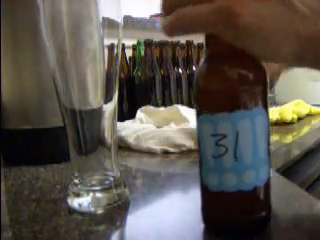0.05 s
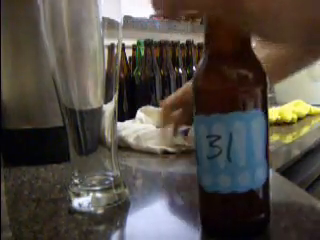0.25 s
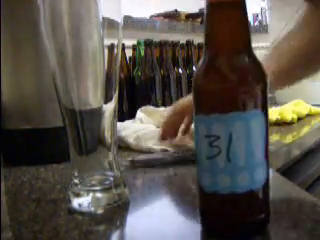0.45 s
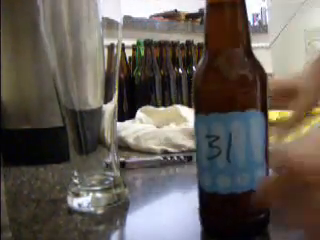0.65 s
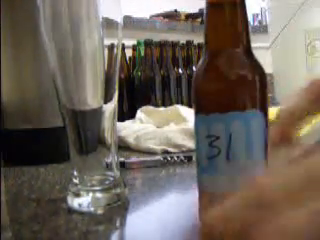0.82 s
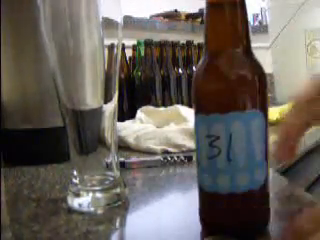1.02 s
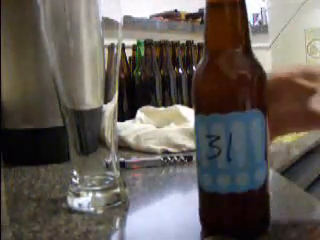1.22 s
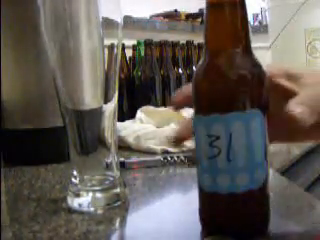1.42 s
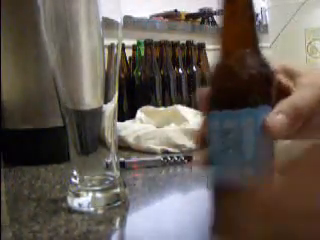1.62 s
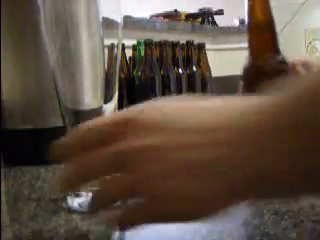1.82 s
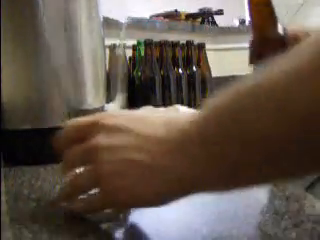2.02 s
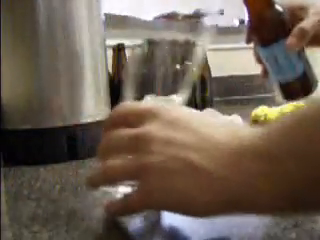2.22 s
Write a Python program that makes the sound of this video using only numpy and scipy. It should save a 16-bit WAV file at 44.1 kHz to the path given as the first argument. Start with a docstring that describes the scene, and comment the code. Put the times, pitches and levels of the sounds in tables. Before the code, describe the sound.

A beer bottle is opened with a sharp snap. The metal opener clatters onto a stone counter, the cap bounces with bright clinks, and the bottle slides briefly. The sounds are close, in a small kitchen with faint hum.

```python
"""A beer bottle is opened on a stone kitchen counter, close to a small microphone.
First the opener snaps the cap off; it then drops, thuds on the counter and clatters to rest.
Next the cap bounces, each impact exciting its ringing modes. The bottle slides away with a rumble of
friction, and last a hand brushes a glass. Throughout, soft bumps sound on the counter, the small room
reverberates, and a background of hiss and hum swells and sinks."""
import sys
import numpy as np
from scipy import signal
from scipy.fft import rfft, irfft
from scipy.io import wavfile

SR = 44100
rng = np.random.default_rng(int(sys.argv[2]) if len(sys.argv) > 2 else 0)


def waveform_to_disk(signal):
    """Save audio, clipped to [-1, 1], as 16-bit WAV at the path in sys.argv[1]."""
    frames = np.transpose(np.atleast_2d(signal))
    scaled = np.clip(frames, -1, 1) * 32767
    samples = np.round(scaled).astype(np.int16)
    wavfile.write(sys.argv[1], SR, samples)


N = 103635
T = np.arange(N) / SR
RING_T = T[:SR // 2]
FREQS = np.fft.rfftfreq(N, 1 / SR)


def amp(db):
    """Decibels as an amplitude ratio."""
    return 10 ** (np.asarray(db) / 20)


def unit(x):
    """Normalisation to an rms of 1."""
    return x / np.sqrt(np.mean(abs(x) ** 2) + 1e-20)


def read(points, hz):
    """Interpolation of a spectrum on a log-frequency axis."""
    f, value = np.transpose(points)
    return np.interp(np.log(hz + 1), np.log(f + 1), value)


def add(mix, start, sound):
    """Superposition: a sound joins the mix at its start in seconds."""
    part = mix[max(round(start * SR), 0):][:len(sound)]
    part += sound[:len(part)]


def gate(start, rise, release, fall):
    """A trapezoidal envelope, with times in seconds."""
    return np.clip((T - start) / rise, 0, 1) * np.clip(1 - (T - release) / fall, 0, 1)


def filtered_noise(gain):
    """Spectral shaping: white noise is weighted by a gain at each frequency."""
    return unit(irfft(rfft(rng.standard_normal(N)) * gain, N))


def noise(colour):
    """Stationary noise with a spectral envelope given in dB."""
    return filtered_noise(amp(read(colour, FREQS)))


def wander(hz):
    """Low-pass noise: random motion up to about the given rate."""
    return filtered_noise(np.exp(-(FREQS / hz) ** 2))


def contact(colour, t60, rattle_db, size=4096):
    """Source and filter: an impulse and a decaying rattle drive a body's minimum-phase response."""
    drive = rng.standard_normal(size) * amp(-60 * T[:size] / t60)
    drive *= amp(rattle_db) / np.linalg.norm(drive)
    drive[0] += 1
    log_gain = np.log(amp(read(colour, abs(np.fft.fftfreq(size, 1 / SR)))))
    body = np.fft.ifft(np.exp(np.conj(signal.hilbert(log_gain)))).real
    return 2 * signal.fftconvolve(drive, body[:size // 2])


def ring(modes):
    """Free vibration: each mode is an exponentially damped sine."""
    return sum(amp(db - 60 * RING_T / t60) * np.sin(2 * np.pi * hz * RING_T) for hz, db, t60 in modes)


def opener():
    """Impact excitation: the opener lands handle first and clatters, ringing itself and the counter."""
    # Each row: start in seconds, then thud, clack and treble levels in dB.
    drops = [(0.4343, -1.5, -9, -8.5), (0.4358, -4.5, -21, -14.5), (.4385, -2.5, -23, -26),
             (.476, -8.5, -2.5, -13.5), (.5033, -15, -7.5, -11), (0.5055, -11, -2.5, -8),
             (0.5102, -12, -9, -12.5), (.518, -10.5, -11.5, -25), (.522, -13, -23, -30),
             (.537, -21, -26, -19), (0.5838, -30, -21, -20.5), (.587, -17, -11, -27),
             (.599, -16.5, -29, -43), (0.6201, -25, -14.5, -30), (0.641, -34, -22.5, -39),
             (0.668, -20.5, -28.5, -57)]
    # Spectra of the three parts of an impact. Each row: frequency in Hz, level in dB.
    thud = [(50, -15), (150, 14.5), (260, 16), (450, 18.5), (700, 13), (1200, 6), (1600, 3), (2600, -19.5),
            (6000, -28)]
    clack = [(200, -4), (900, -3), (1400, 7.5), (2100, 9.5), (3000, 5.5), (4000, 1), (4700, -15.5),
             (10000, -26.5)]
    treble = [(1500, -35), (4000, -4), (6300, 2), (8300, -6), (9900, -1.5), (12000, -14), (15000, -10)]
    # Each row: mode frequency in Hz, level in dB, T60 in seconds.
    counter_modes = [(144, -29, 0.43), (215, -25, .1), (240, -26, 0.23), (261, -27, .2), (358, -25, 0.15),
                     (435, -29, .16), (490, -31, .1), (578, -22, .12), (622, -25, .1), (764, -27, 0.1),
                     (861, -26, 0.1)]
    opener_modes = [(1255, -36, .17), (1373, -24.5, .18), (1630, -31, .1), (1968, -28, .12),
                    (2037, -33, .16), (2112, -28, .12), (2142, -31, .12), (2841, -34, .11)]
    out = np.zeros(N)
    for start, thud_db, clack_db, treble_db in drops:
        add(out, start, amp(thud_db) * contact(thud, t60=.12, rattle_db=4))
        add(out, start, amp(thud_db) * ring(counter_modes))
        add(out, start, amp(clack_db) * contact(clack, t60=.05, rattle_db=4.5))
        add(out, start, amp(clack_db) * ring(opener_modes))
        add(out, start, amp(treble_db) * contact(treble, t60=.035, rattle_db=6.5))
    return out


def snap():
    """Sudden release: the opener's jaw slips off in quick ticks that excite the cap's modes."""
    # Each row: start in seconds, level in dB.
    slips = [(.2453, -13.5), (.2473, -14), (.2481, -13.5)]
    # Spectrum of a slip. Each row: frequency in Hz, level in dB.
    colour = [(100, -9), (650, -6), (1000, -18), (2500, -9), (3200, 4.5), (6000, 3.5), (9500, -1),
              (12000, -9.5), (15000, -3)]
    # Each row: mode frequency in Hz, level in dB, T60 in seconds.
    modes = [(3195, -30, .18), (3465, -25, .1), (3586, -14, .04), (4475, -25, .045), (5051, -22, .04),
             (6257, -24, .04), (7750, -29, .05), (8857, -24, .05)]
    out = np.zeros(N)
    for start, db in slips:
        add(out, start, amp(db) * contact(colour, t60=.033, rattle_db=9))
        add(out, start, amp(db) * ring(modes))
    return out


def cap(split_hz=100, twin_db=-9, upper_hz=4434, upper_t60=.27, wobble_hz=28, flutter_db=2.2):
    """Beating and modulation: each bounce rings the cap's modes; spin wavers their pitch and level."""
    # Each row: start in seconds, click, knock and main ring levels in dB, main pitch in Hz,
    # its T60 in seconds, upper ring level in dB, gain of the other modes in dB.
    bounces = [(.904, -15.5, -7, -21.5, 3828, 0.28, -37, 0.5), (0.945, -8, -9.5, -10, 3915, 0.026, -24, 1),
               (0.9987, -13, -15, -41, 3930, 0.044, -37, -3),
               (1.0021, -12, -32, -14, 3950, 0.05, -47, -1.5),
               (1.0037, -14, -32, -8.5, 3960, 0.033, -24.5, -16),
               (1.007, -23, -45, -9, 3989, 0.04, -43, 0.5),
               (1.0475, -16.5, -30, -22, 3975, 0.086, -40, -16),
               (1.0788, -15, -35, -25.5, 3180, 0.073, -50, 1.5), (1.082, -19, -42, -31, 3990, .1, -59, -27),
               (1.092, -20.5, -41, -29, 3925, 0.08, -56, -22), (1.105, -29, -35, -38, 3970, 0.14, -57, -28)]
    # Each row: mode frequency in Hz, level in dB, T60 in seconds.
    other_modes = [(3470, -42, .14), (7170, -35, .07), (7590, -40, .06), (8510, -37, .05),
                   (11600, -41, .05)]
    # Spectra of a landing. Each row: frequency in Hz, level in dB.
    click = [(300, -44), (2000, 1.5), (2800, 7.5), (3500, 17), (3950, 20.5), (4200, 2), (5200, 4.5),
             (7500, 3.5), (9700, -2), (12000, -12), (15000, -19)]
    knock = [(150, -13), (550, 5), (1100, 10), (1600, 0), (2200, 7.5), (3500, -9), (8000, -20)]
    impacts, rings = np.zeros((2, N))
    main_rise = 1 - np.exp(-RING_T / .002)
    upper_rise = 1 - np.exp(-RING_T / .008)
    for start, click_db, knock_db, main_db, hz, t60, upper_db, other_db in bounces:
        add(impacts, start, amp(click_db) * contact(click, t60=.03, rattle_db=1.5))
        add(impacts, start, amp(knock_db) * contact(knock, t60=.03, rattle_db=1.5))
        beating_pair = ring([(hz, 0, t60), (hz - split_hz, twin_db, t60)])
        add(rings, start, amp(main_db) * main_rise * beating_pair)
        add(rings, start, amp(other_db) * ring(other_modes))
        add(rings, start, upper_rise * ring([(upper_hz, upper_db, upper_t60)]))
    wobble = np.exp(2j * np.pi * np.cumsum(wobble_hz * wander(hz=90)) / SR)
    flutter = unit(amp(flutter_db * wander(hz=110)))
    return impacts + (signal.hilbert(rings) * wobble).real * flutter


def chatter(start=.46, ticks_per_s=1100, level_db=-31.5, decay_db_per_s=54):
    """Shot noise: the opener's loose parts make many tiny random contacts as it settles."""
    # Spectrum of a tick. Each row: frequency in Hz, level in dB.
    colour = [(200, -3), (600, 5), (1100, 1), (2100, -11), (3900, -11), (4600, -12), (8500, -14),
              (14000, -66)]
    struck = rng.random(N) < ticks_per_s / SR
    tick_db = .5 * np.minimum(rng.exponential(1, N), 4)
    ticks = struck * amp(tick_db) * rng.choice([-1, 1], N)
    rattle = unit(irfft(rfft(ticks) * amp(read(colour, FREQS)), N))
    window = gate(start, rise=.012, release=.671, fall=.027)
    return rattle * window * amp(level_db - decay_db_per_s * (T - start))


def bumps():
    """Cushioned impact: hand and glass meet the counter softly, giving a low tone and a dull scuff."""
    # Each row: start in seconds, level in dB, pitch in Hz, length in seconds, relative scuff in dB.
    blows = [(.002, -34.5, 200, 0.032, -10), (0.246, -32, 59.5, 0.028, -3), (0.319, -27.5, 72, 0.048, -9.5),
             (0.339, -25, 381, 0.042, -1.5), (0.35, -23.5, 177, 0.043, -8), (.371, -23.5, 383, 0.015, 0),
             (.376, -15, 208, 0.027, -13), (0.393, -25, 122, 0.036, -15), (0.876, -21, 50.4, 0.068, -12),
             (0.894, -35, 114, 0.051, -4), (1.316, -29.5, 58, 0.081, -15.5),
             (1.615, -25.5, 119.3, 0.11, -14.5), (1.695, -33, 370, 0.036, -5)]
    # Spectrum of the scuff. Each row: frequency in Hz, level in dB.
    scuff = [(40, 10), (150, -0.5), (400, 0.5), (720, -6), (1100, -20), (2000, -25), (8000, -66)]
    out = np.zeros(N)
    for start, db, hz, length, scuff_db in blows:
        u = T / (.24 * length)  # the envelope peaks at u = 1
        envelope = amp(db) * (u * np.exp(1 - u)) ** 2
        add(out, start, envelope * (np.sin(2 * np.pi * hz * T) + amp(scuff_db) * noise(scuff)))
    return out


def slide(start=1.649, rise=.059, grind_db=-35.5, grain_db=2.5, lift_db_per_s=62):
    """Forced vibration: grainy friction under the bottle drives the counter's resonances."""
    # Each row: centre frequency in Hz, half-width in Hz, level in dB.
    resonances = [(224.7, 11, -38.5), (365, 13, -42), (682, 26, -40.5)]
    # Spectrum of the friction. Each row: frequency in Hz, level in dB.
    colour = [(40, -44), (110, 6), (160, -7), (224, 9.5), (300, -21), (365, -10), (450, -4), (590, -12.5),
              (690, -2.5), (930, -15.5), (1300, -16), (3000, -22.5), (9000, -40), (15000, -50)]
    drone = sum(amp(db) * filtered_noise(1 / (1 + ((FREQS - hz) / width) ** 2))
                for hz, width, db in resonances)
    grind = amp(grind_db) * unit(noise(colour) * amp(grain_db * wander(hz=119)))
    lift = amp(-lift_db_per_s * np.maximum(T - start - rise, 0))  # the weight comes off
    return gate(start, rise, release=1.815, fall=.083) * (grind + drone * lift)


def rustle(start=2.073, rise=.015, t60=.55, level_db=-46.5):
    """Soft friction: the hand takes the glass with a dull, decaying brush of noise."""
    # Spectrum of the brush. Each row: frequency in Hz, level in dB.
    colour = [(60, -4), (140, 7), (550, -11), (1200, -33)]
    age = np.maximum(T - start, 0)
    return np.minimum(age / rise, 1) * amp(level_db - 60 * age / t60) * noise(colour)


def kitchen(x, build_up_s=.0053):
    """Reverberation: a small hard room returns a diffuse tail whose highest treble dies first."""
    # Each row: frequency in Hz, reverberation time in seconds, level in dB.
    bands = [(100, .5, -12.5), (400, 0.39, -6), (1200, 0.44, -7), (3000, 0.38, -8.5), (6800, 0.42, -12.5),
             (14000, 0.073, -5.5)]
    hz, t, spectrum = signal.stft(rng.standard_normal(SR), SR, nperseg=256)
    t60, db = (read(np.array(bands)[:, [0, k]], hz)[:, None] for k in (1, 2))
    unit_energy = np.sqrt(2 * np.log(1000) / (t60 * SR))
    tail = signal.istft(spectrum * amp(db - 60 * t / t60) * unit_energy, SR, nperseg=256)[1][:SR]
    onset = np.minimum(T[:SR] / build_up_s, 1) ** 2
    return signal.fftconvolve(x, tail * onset)[:N]


def background(hiss_db=-43, waver_depth=.16, waver_hz=2.8):
    """Amplitude modulation: hiss and a wavering appliance hum swell and sink under one envelope."""
    # Tones of the hum and spectrum of the hiss. Each row: frequency in Hz, level in dB.
    tones = [(59.2, -42.5), (119, -49.5), (225, -54), (354, -55.5), (472, -58.5), (5561, -63.5)]
    hiss = [(20, -15.5), (45, 7.5), (80, -10.5), (150, -10), (225, -5.5), (290, -15.5), (360, -6.5),
            (600, -13.5), (1200, -21.5), (3000, -22.5), (8000, -24), (10000, -26.5), (12000, -32),
            (15000, -31.5)]
    # Each row: time in seconds, gain in dB.
    swell = [(0, -1.5), (.06, -6), (.22, -11.5), (.235, -9), (.26, 0), (.42, -1), (.6, -4), (.76, -1.5),
             (.9, 3.5), (1.15, -2), (1.33, 2), (1.39, -2), (1.47, -13), (1.59, -14), (1.65, 2.5), (1.87, 2),
             (1.97, -12.5), (2.06, -15), (2.1, -7), (2.2, -10.5), (2.35, -17)]
    hum = np.zeros(N)
    for hz, db in tones:
        waver = 1 + waver_depth * (wander(waver_hz) + 1j * wander(waver_hz))
        hum += amp(db) * unit((waver * np.exp(2j * np.pi * hz * T)).real)
    return (hum + amp(hiss_db) * noise(hiss)) * amp(np.interp(T, *np.transpose(swell)))


def scene():
    """Superposition of the direct sound, its reverberation and the background."""
    direct = snap() + opener() + chatter() + cap() + bumps() + slide() + rustle()
    return (direct + kitchen(direct) + background())[None]


def record(dry, overload=.68, low_cut_hz=31, notch_hz=10610, shelf_hz=14480, edge_hz=15800):
    """Saturation and filtering: a small microphone clips softly, notches the treble, limits the band."""
    hz = np.fft.rfftfreq(2 * N, 1 / SR)
    notch_db = -29.5 * np.exp(-((hz - notch_hz) / 505) ** 4)
    shelf_db = -23 * np.clip((hz - shelf_hz) / 250, 0, 1)
    low_cut_db = 20 * np.log10(1e-6 + hz ** 2 / np.sqrt(hz ** 4 + low_cut_hz ** 4))
    clipped = overload * np.tanh(dry / overload)
    coloured = irfft(rfft(clipped, 2 * N) * amp(notch_db + shelf_db + low_cut_db), 2 * N)[:, :N]
    low_pass = signal.firwin(511, edge_hz, window=("kaiser", 9), fs=SR)
    return signal.oaconvolve(coloured, low_pass[None], "same")


dry = scene()
out = record(dry)
waveform_to_disk(out)
```